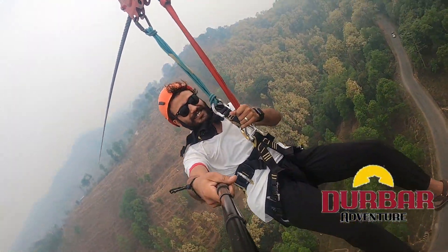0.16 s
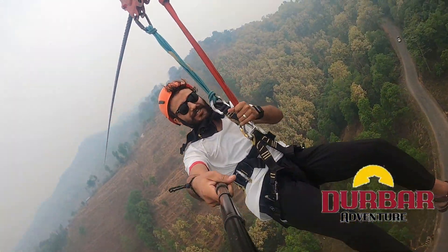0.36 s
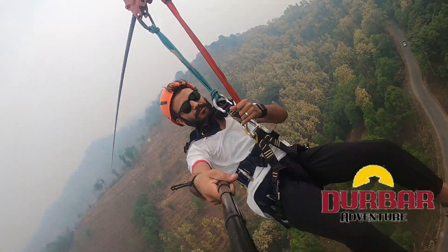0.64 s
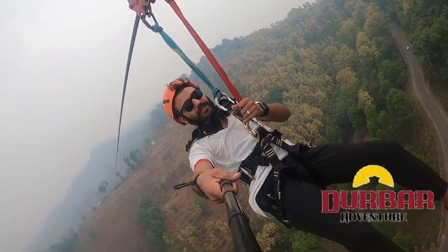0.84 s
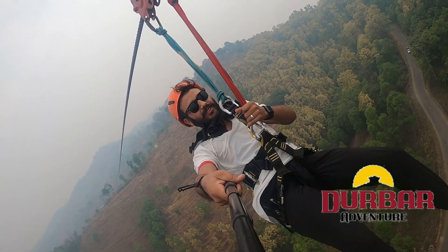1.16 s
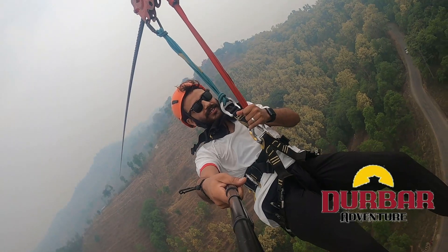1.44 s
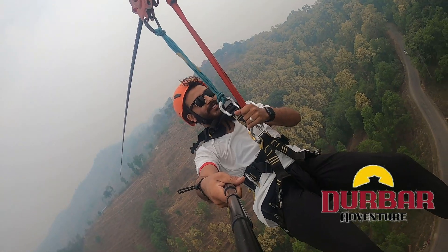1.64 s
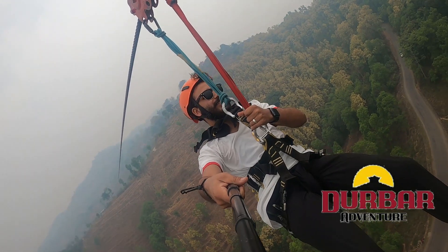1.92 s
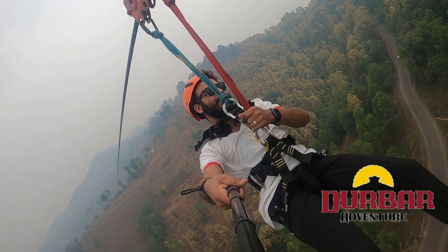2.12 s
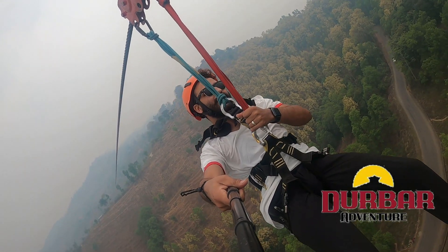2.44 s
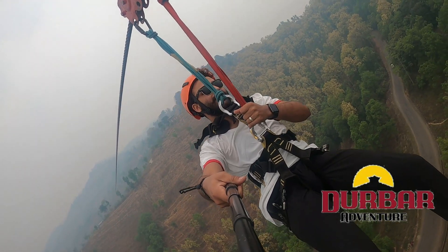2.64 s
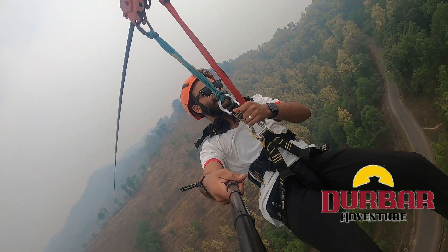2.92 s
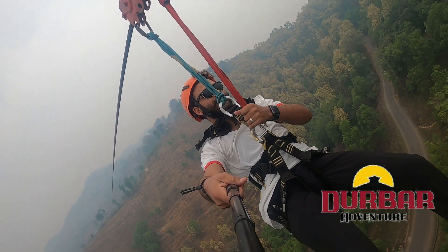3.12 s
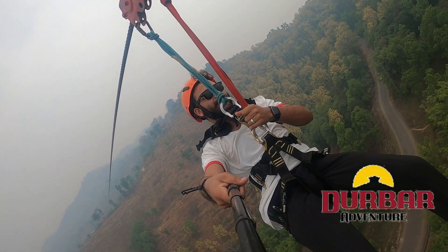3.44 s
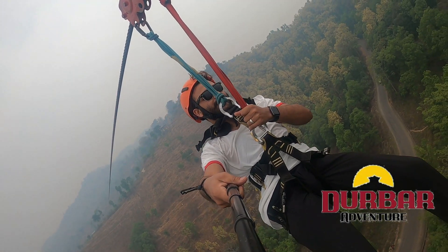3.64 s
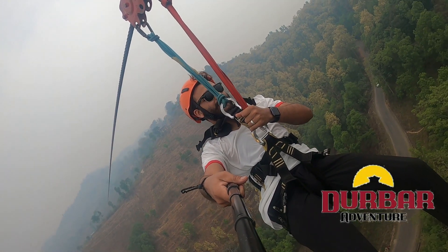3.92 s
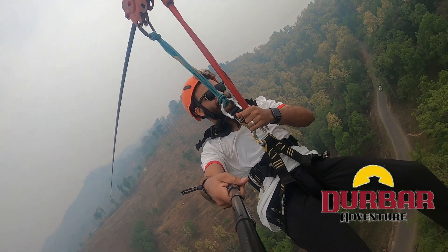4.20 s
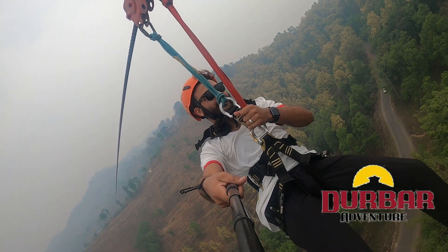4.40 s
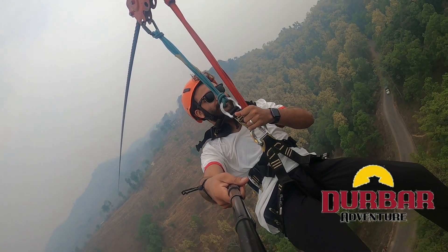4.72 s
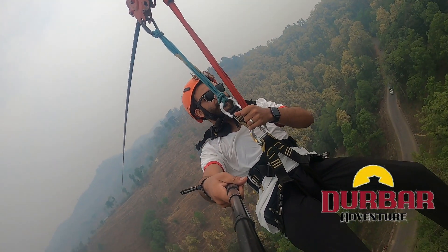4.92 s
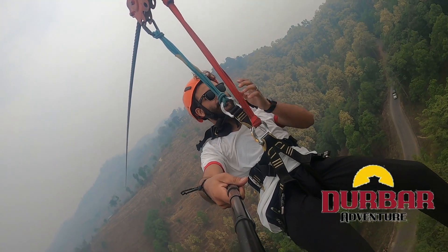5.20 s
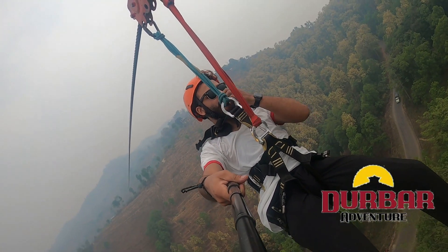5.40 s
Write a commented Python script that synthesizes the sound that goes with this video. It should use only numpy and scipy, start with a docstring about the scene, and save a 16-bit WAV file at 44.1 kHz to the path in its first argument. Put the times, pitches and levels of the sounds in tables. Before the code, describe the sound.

Wind rumbles and buffets the microphone as a pulley speeds down a steel cable, whining steadily over a gritty roar.

```python
"""A pulley trolley races along a stranded steel cable high above a valley. From the start, dense rolling
contacts shake its frame, whose fixed modes whine out of a broad roar. Gusts buffet the two microphone
ports of a small camera on a pole, hardest in the first second, then in scattered thumps. Each port
hears the trolley in its own colour, and gain control ducks the loud moments. The roar eases a little
toward the end."""
import sys
import numpy as np
from scipy import signal
from scipy.fft import rfft, irfft
from scipy.io import wavfile
from scipy.ndimage import uniform_filter1d

SR = 44100
rng = np.random.default_rng(int(sys.argv[2]) if len(sys.argv) > 2 else 0)


def generate_wav(signal):
    """Clip the signal to [-1, 1] and save it as 16-bit WAV at the path in sys.argv[1]."""
    frames = np.transpose(np.atleast_2d(signal))
    scaled = np.clip(frames, -1, 1) * 32767
    pcm = np.round(scaled).astype(np.int16)
    wavfile.write(sys.argv[1], SR, pcm)


N = 244755
TIME_S = np.arange(N) / SR
BIN_HZ = np.maximum(np.arange(N // 2 + 1) * SR / N, 1.)


def trolley(contacts_per_s, spread_db, level_db):
    """Wire crowns strike the wheel grooves densely and unevenly, shaking the frame; near and far port."""
    swells_db = ride_swells(flutter_db=.44, surge_db=.6, rasp_fade_db=1)
    strikes = rng.random((2, N)) < contacts_per_s / SR
    hits = strikes * rng.standard_normal((2, N)) * from_db(spread_db * drift(300))
    direct, scattered = wheel_contact(hits, swells_db)
    frame = frame_response()
    return from_db(level_db) * np.array([coloured(direct, frame), far_port(direct, scattered, frame)])


def ride_swells(flutter_db, surge_db, rasp_fade_db):
    """Swells of drone, roar, grit and rasp in dB; the rasp surges on the grit and eases over the ride."""
    # cable drone, trolley roar and wheel grit about their usual levels: time_s, drone_db, roar_db, grit_db
    ride = [(0, -1, 0.5, 1.5), (.6, -3.5, -0.5, .5), (1.2, -.5, -0.5, 1.5), (1.8, 0, -3, 2),
            (2.4, -1.5, -4, .5), (3, -.5, -1, .5), (3.6, 1, -3, .5), (4.2, 1.5, -1.5, 1),
            (4.8, 0, -4, -1.5), (5.55, -0.5, -3.5, -1.5)]
    drone_db, roar_db, grit_db = in_time(ride)
    grit_db = grit_db + flutter_db * drift(7.9)  # contact pressure wavers
    rasp_db = grit_db + surge_db * drift(14) + rasp_fade_db * (.5 - np.arange(N) / N)
    return drone_db, roar_db, grit_db, rasp_db


def wheel_contact(hits, swells_db, drone_to_hz=766, grit_from_hz=1370, rasp_from_hz=4800):
    """The rolling contact splits into drone, roar, grit and rasp, each riding its own swell."""
    drone = coloured(hits, 1 / (1 + (BIN_HZ / drone_to_hz) ** 8))
    treble = coloured(hits, 1 / (1 + (grit_from_hz / BIN_HZ) ** 6))
    rasp = coloured(hits, 1 / (1 + (rasp_from_hz / BIN_HZ) ** 12))
    roar, grit = hits - drone - treble, treble - rasp
    return sum(from_db(db) * band for db, band in zip(swells_db, (drone, roar, grit, rasp)))


def frame_response():
    """Fixed modes of the frame and wheels stand out of a broad body and make the whine."""
    # broad colour of frame and near port: pitch_hz, level_db
    body = [(90, -46.5), (140, -23), (230, -35.5), (400, -32), (720, -25), (880, -19), (960, -10.5),
            (1250, -11.5), (1450, -19), (2100, -17), (2700, -21.5), (3250, -15), (4000, -19.5),
            (5000, -38.5), (5600, -49.5), (8000, -54.5), (13000, -74), (16000, -87)]
    # lopsided frame and wheel modes, and the dips between: pitch_hz, width_below_hz, width_above_hz, lift_db
    frame_modes = [(184.4, 5.4, 7, 3), (397.5, 17, 15, -4.5), (523, 180, 148, 9.5), (1042.8, 93, 94, 11),
                   (1128.3, 32.4, 7.4, 9.5), (1333.6, 62, 22, 13.5), (1354.5, 18.4, 24, 16),
                   (1594, 83, 90, 5), (1746, 120, 110, -8), (1787, 13, 45, 7.5), (1850, 37, 30, 0.5),
                   (2040, 88, 71, 1), (2363, 88, 55, 10), (2443, 51, 16, 3.5), (2613, 50, 34, 6.5),
                   (3070, 20, 8, 8.5), (3660, 50, 27, 7), (3515, 40, 45, 0.5), (4307, 38, 70, 5),
                   (4675, 110, 160, 4.5), (5130, 100, 140, -0.5), (5910, 370, 250, -4.5),
                   (6790, 900, 420, 6), (8700, 200, 350, -19), (10300, 600, 350, -10.5),
                   (12200, 200, 200, 3.5), (13650, 500, 500, -13)]
    return rms_one(from_db(in_pitch(body)[0] + mode_lifts(frame_modes)))


def far_port(direct, scattered, frame):
    """The far port hears the frame shaded and shifted in phase, with some sound by other paths."""
    # far port against near port: pitch_hz, level_db, phase_lead_rad, likeness (0-1)
    far_colour = [(300, -1.8, 0, .995), (600, -4.8, -.05, .99), (870, -7, -.5, .97), (1300, -5, -.85, .995),
                  (1750, 3, -.5, .96), (2000, 2.2, .45, .99), (2350, -1, 1.05, .99), (3000, -5, 1.0, .985),
                  (3600, -14.5, .8, .93), (4000, -17, 1.8, .75), (4600, -8, 0, .75), (5050, 1, -2.2, .75),
                  (5500, 1, -2.2, .6), (6100, 4, 2.5, .4), (7200, -2, 2.0, .3), (8200, -12, 1.5, .3),
                  (9500, -11, 1.5, .3), (12000, -3, 1.2, .4)]
    # resonances and shadows of the far port alone: pitch_hz, width_below_hz, width_above_hz, lift_db
    port_modes = [(870, 200, 40, -2), (3730, 100, 100, -3), (4200, 160, 200, 8), (4600, 200, 100, -3),
                  (4760, 150, 150, 3), (5040, 80, 80, 5), (5620, 100, 100, 7), (6180, 80, 80, 4)]
    far_db, lead_rad, likeness = in_pitch(far_colour)
    shade = frame * from_db(far_db + mode_lifts(port_modes))
    shared = coloured(direct, shade * likeness * np.exp(1j * lead_rad))
    return shared + coloured(scattered, shade * np.sqrt(1 - likeness ** 2))


def wind(buffet_db, edge_db, likeness=.88, left_db=1.6, right_db=-1.9):
    """Pressure lumps rumble on the ports, mostly shared by both; the edges of gusts reach higher."""
    # deep, slow buffeting: pitch_hz, level_db
    buffet_colour = [(10, -12.5), (22, -3), (35, -0.5), (60, -2.5), (90, -27.5), (200, -68.5), (400, -120)]
    # sharper edge of a gust: pitch_hz, level_db
    edge_colour = [(40, -19.5), (75, 3.5), (105, -1.5), (150, -11), (200, -20), (300, -36), (600, -120)]
    shared, own = rng.standard_normal((2, 2, N))
    right = likeness * shared + np.sqrt(1 - likeness ** 2) * own
    buffet = coloured([shared[0], right[0]], from_db(in_pitch(buffet_colour)[0]))
    edge = coloured([shared[1], right[1]], from_db(in_pitch(edge_colour)[0]))
    air = evened(buffet, over_s=.076) * from_db(buffet_db) + evened(edge, over_s=.05) * from_db(edge_db)
    return air * from_db([[left_db], [right_db]])


def gusts(rise_s=.028, fall_s=.012, eddy_db=2, eddy_hz=12):
    """Buffet and edge levels in dB: thumps swell out of an airstream made lumpy by small eddies."""
    # steady airstream on the ports: time_s, buffet_db, edge_db
    breeze = [(0, -30, -43), (.12, -27, -32), (.28, -27, -33.5), (.4, -38, -53), (.6, -44, -46),
              (.84, -43.5, -47), (.95, -37, -39.5), (1.6, -32, -42), (2.1, -38.5, -43.5),
              (2.55, -39, -48.5), (2.75, -37, -43), (3.2, -35, -38), (3.7, -35, -42.5), (4.3, -34, -39.5),
              (4.95, -40.5, -42), (5.15, -29, -39), (5.25, -37, -41.5), (5.55, -42, -45.5)]
    # thumps of the strongest gusts: peak_s, buffet_db, edge_db
    thumps = [(.23, -32, -19.5), (.495, -20.5, -35.5), (.551, -19.5, -25), (.93, -32, -40),
              (1.04, -33, -42.5), (1.27, -39, -36), (1.36, -27.5, -47), (1.57, -25.5, -43),
              (2.02, -36, -40), (2.73, -30, -38), (2.91, -24, -28), (3.01, -25, -35.5), (3.15, -37, -35.5),
              (3.34, -25, -39), (3.43, -32.5, -40), (3.581, -27, -34), (3.86, -29, -29), (3.95, -27.5, -42),
              (4.24, -30, -28), (4.64, -29, -42), (4.75, -22, -36), (4.87, -31, -40), (5.13, -24.5, -34),
              (5.43, -25.5, -41)]
    peak_s, *thumps_db = np.transpose(thumps)
    since_s = TIME_S - peak_s[:, None]
    bells = np.exp(-(since_s / np.where(since_s < 0, rise_s, fall_s)) ** 2)
    levels_db = []
    for breeze_db, thump_db in zip(in_time(breeze), thumps_db):
        breeze_power = from_db(2 * (breeze_db + eddy_db * drift(eddy_hz)))
        thump_power = from_db(2 * thump_db) @ bells
        levels_db.append(10 * np.log10(breeze_power + thump_power))
    return levels_db


def mode_lifts(modes):
    """Each mode lifts or dips the response in dB, falling away at its own rate on either side."""
    total_db = 0
    for pitch_hz, below_hz, above_hz, lift_db in modes:
        detune = 2 * (BIN_HZ - pitch_hz) / np.where(BIN_HZ < pitch_hz, below_hz, above_hz)
        total_db = total_db + lift_db / (1 + detune ** 2)
    return total_db


def evened(noise, over_s):
    """Noise with its own slow swells ironed out, so that the gusts shape it."""
    power = uniform_filter1d(np.mean(noise ** 2, axis=0), int(over_s * SR))
    return rms_one(noise / np.sqrt(power + .12 * power.mean()))


def drift(rate_hz):
    """Random wander at rms 1: noise through two one-pole low-passes."""
    pole = np.exp(-2 * np.pi * rate_hz / SR)
    return rms_one(signal.lfilter([1], [1, -2 * pole, pole * pole], rng.standard_normal(N + SR))[SR:])


def coloured(x, response):
    """A sound through a frequency response."""
    return irfft(rfft(x) * response, N)


def in_time(rows):
    """Columns of an envelope at every sample."""
    time_s, *columns = np.transpose(rows)
    return [np.interp(TIME_S, time_s, column) for column in columns]


def in_pitch(rows):
    """Columns of a spectrum at every frequency bin."""
    pitch_hz, *columns = np.transpose(rows)
    return [np.interp(np.log(BIN_HZ), np.log(pitch_hz), column) for column in columns]


def from_db(db):
    """dB to gain."""
    return 10 ** (np.asarray(db) / 20)


def rms_one(x):
    """Scaled to rms 1."""
    return x / np.sqrt(np.mean(x ** 2) + 1e-20)


def scene():
    """The trolley on its cable, with wind on the ports."""
    return trolley(contacts_per_s=30000, spread_db=.62, level_db=-14) + wind(*gusts())


def record(dry, target_db=-18.5, squeeze=.77, follow_s=.0089, release_db_per_s=74.5, cutoff_hz=15750):
    """Gain control ducks fast on loud moments and lets go steadily; a short fade-in, and the top is cut."""
    sidechain = signal.sosfilt(signal.butter(2, 220, "high", fs=SR, output="sos"), dry)
    pole = np.exp(-1 / (follow_s * SR))
    power = np.mean(sidechain ** 2, axis=0)
    followed, _ = signal.lfilter([1 - pole], [1, -pole], power, zi=[from_db(2 * target_db)])
    release_db = release_db_per_s * TIME_S
    held_db = np.maximum.accumulate(10 * np.log10(followed) + release_db) - release_db
    levelled = dry * from_db(-squeeze * (held_db - target_db))
    fade_in = np.sin(np.minimum(TIME_S / .001, 1) * np.pi / 2) ** 2
    high_cut = signal.ellip(12, .5, 70, cutoff_hz, fs=SR, output="sos")
    return signal.sosfilt(high_cut, levelled * fade_in)


dry = scene()
out = record(dry)
generate_wav(out)
```